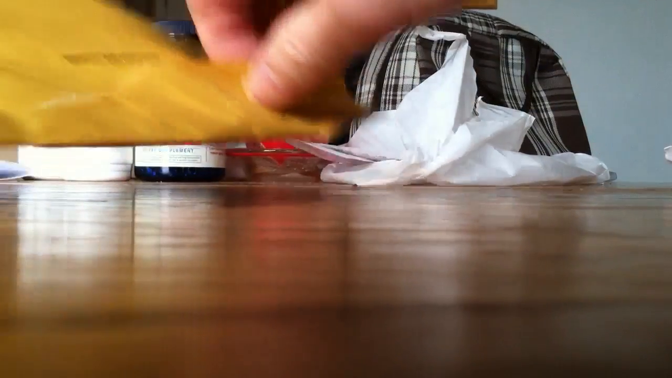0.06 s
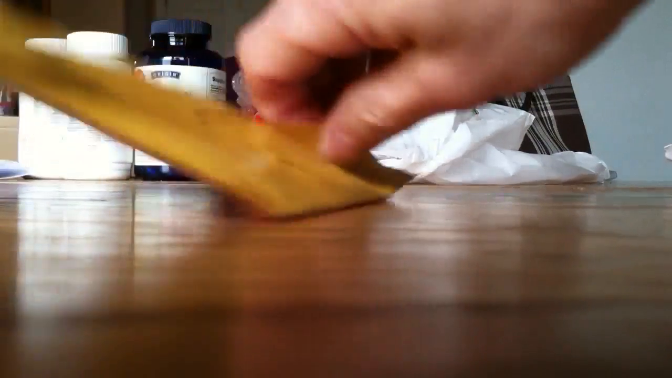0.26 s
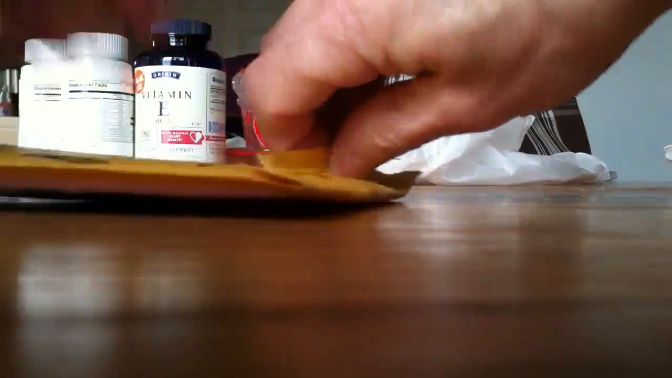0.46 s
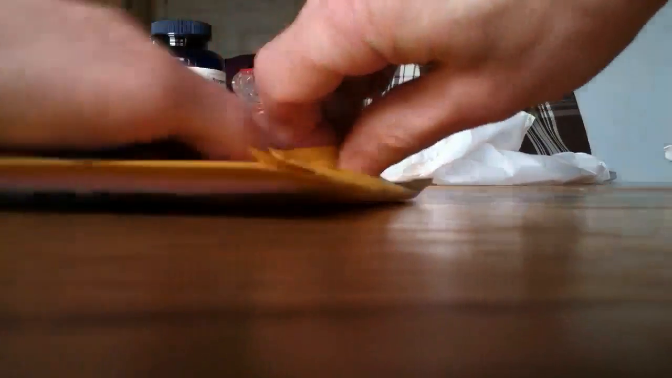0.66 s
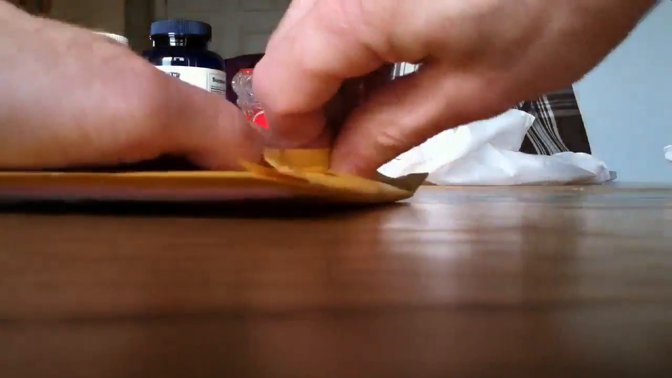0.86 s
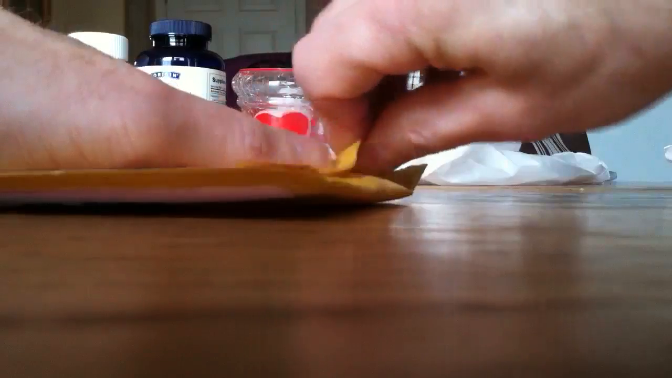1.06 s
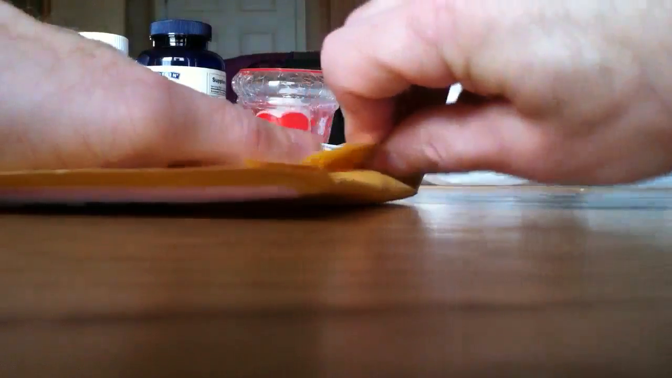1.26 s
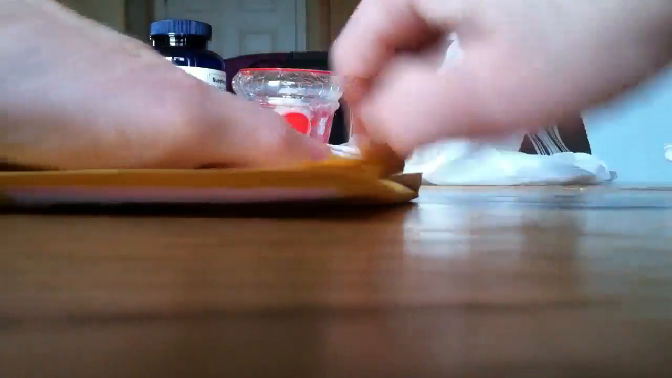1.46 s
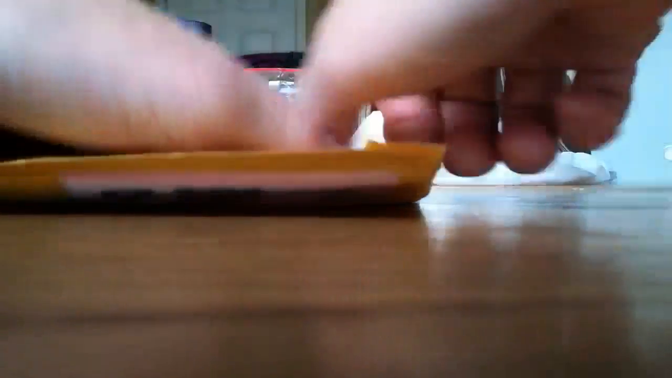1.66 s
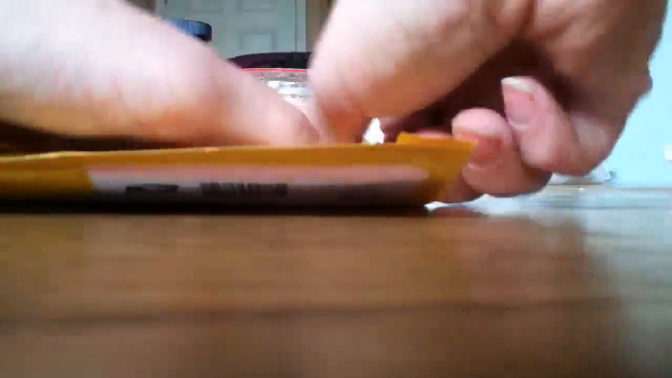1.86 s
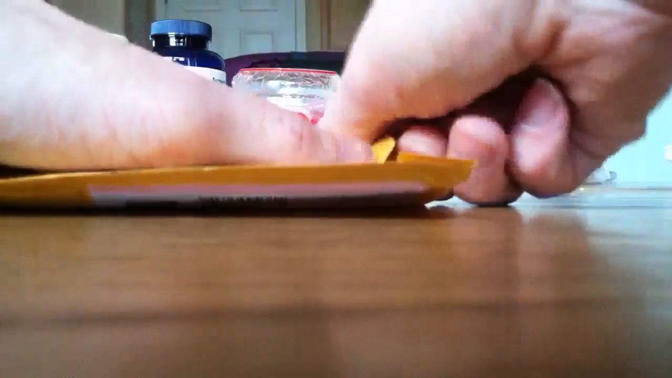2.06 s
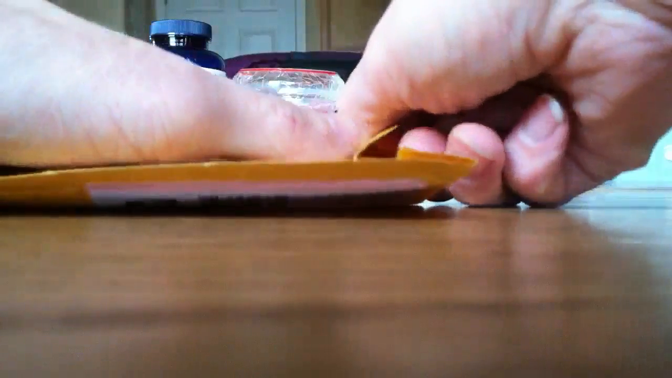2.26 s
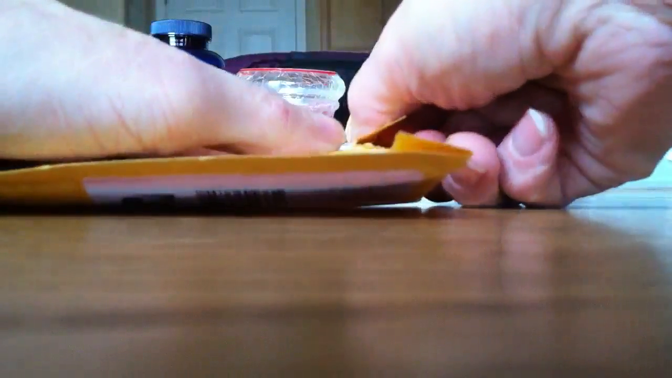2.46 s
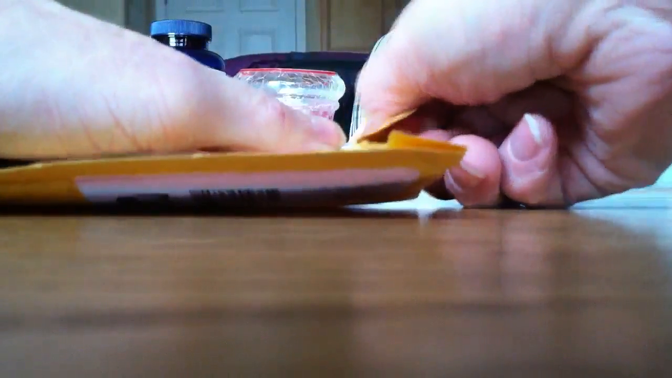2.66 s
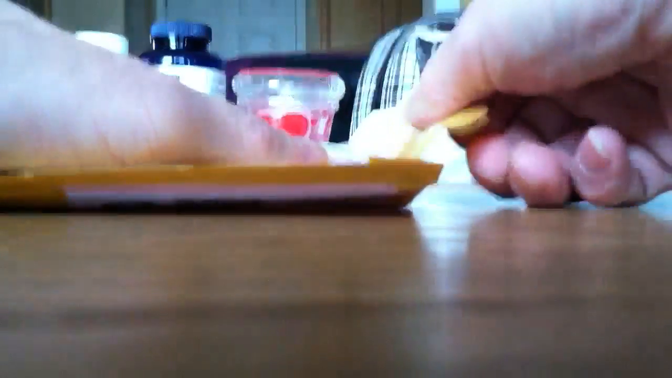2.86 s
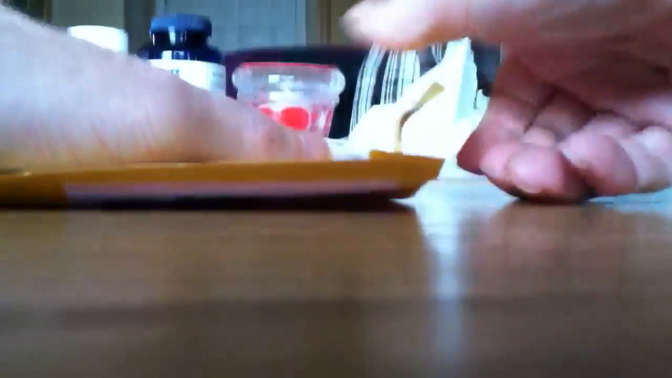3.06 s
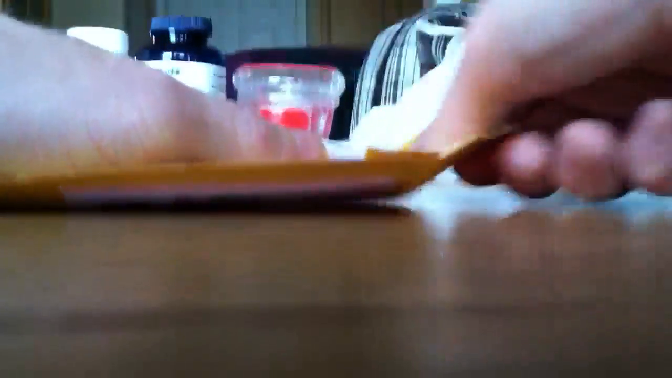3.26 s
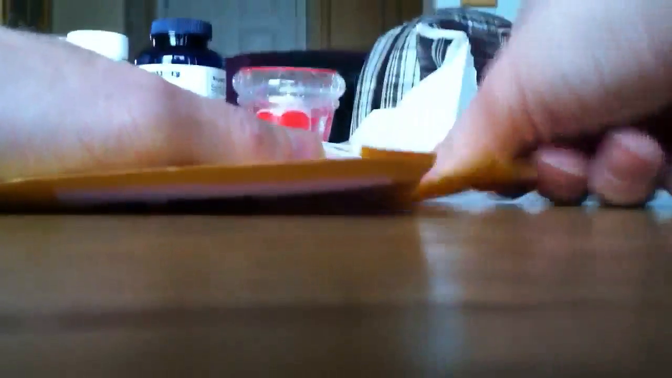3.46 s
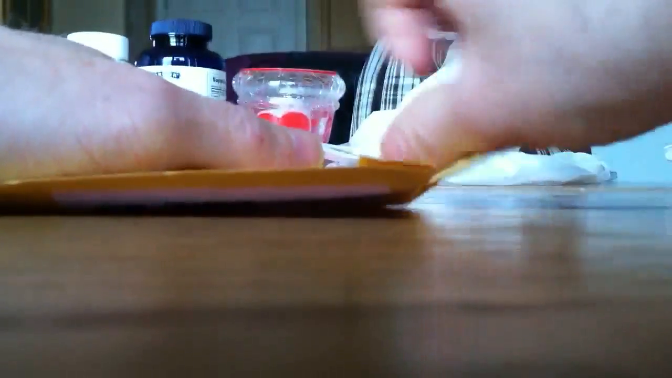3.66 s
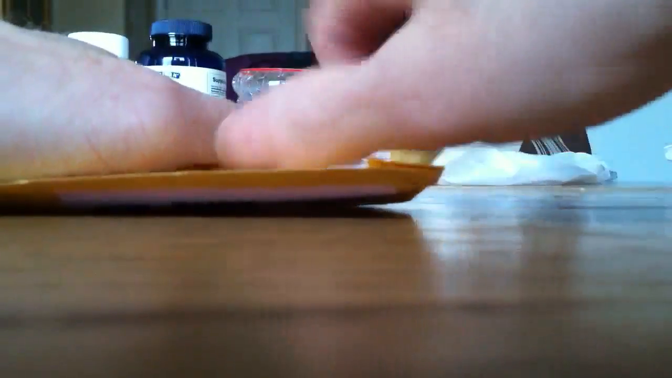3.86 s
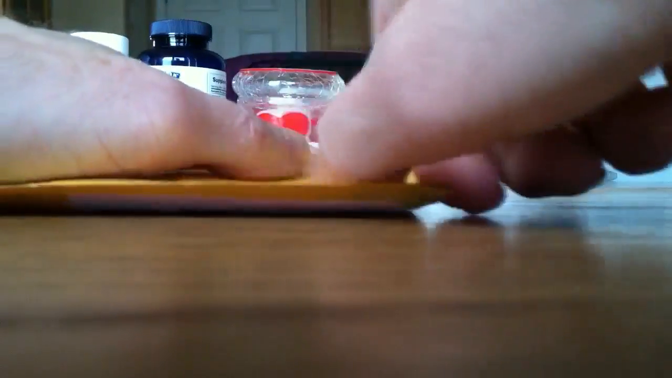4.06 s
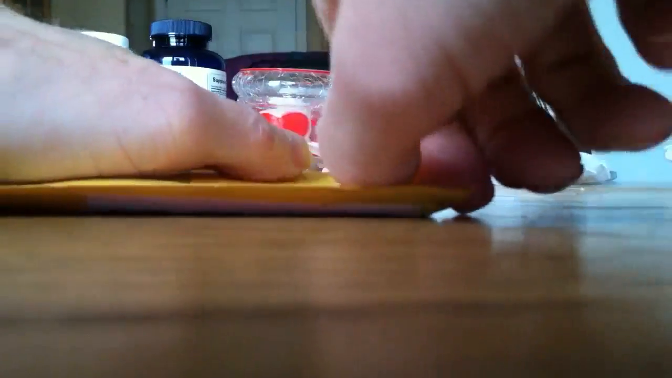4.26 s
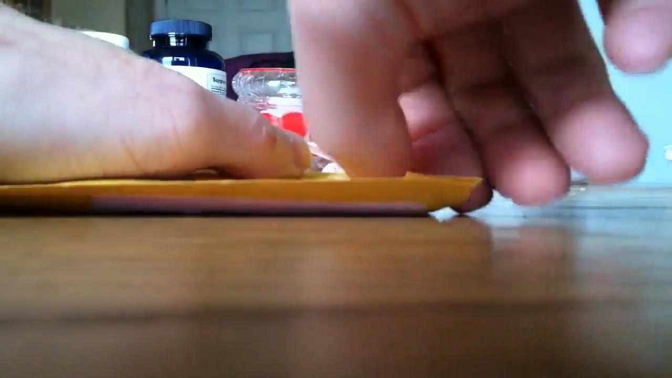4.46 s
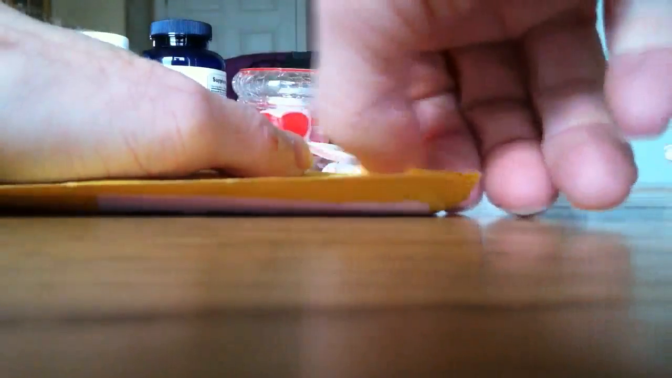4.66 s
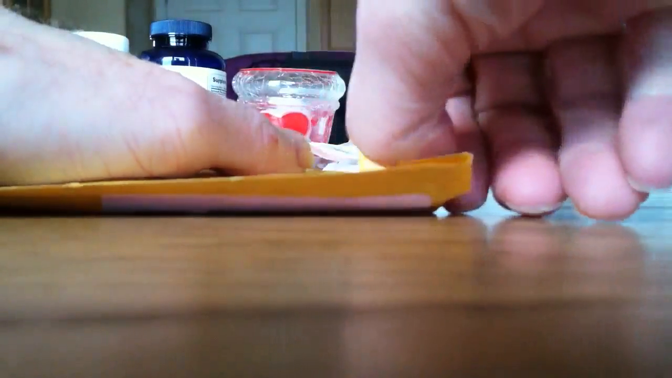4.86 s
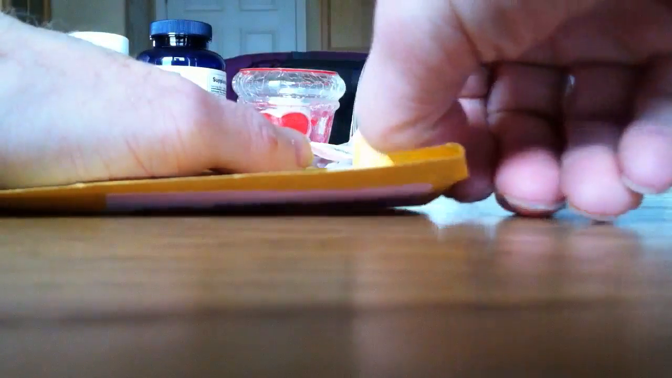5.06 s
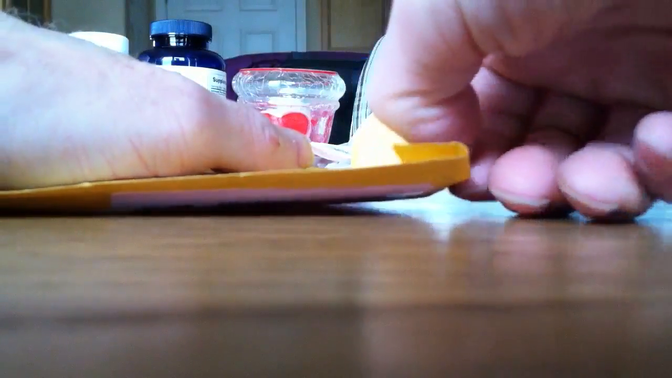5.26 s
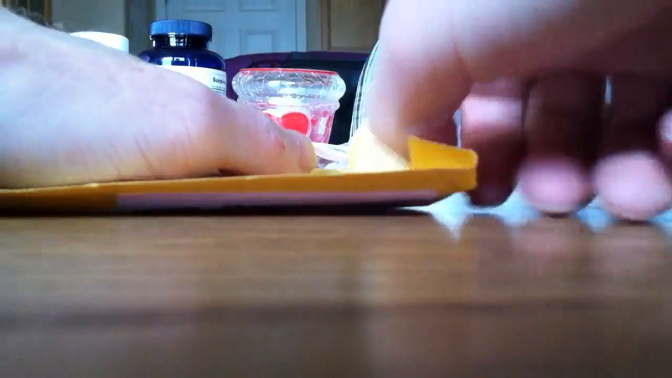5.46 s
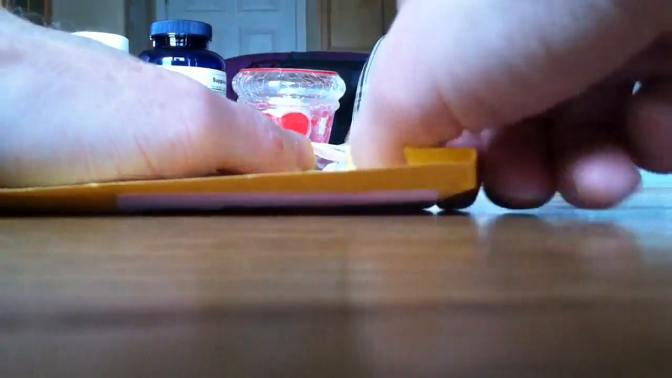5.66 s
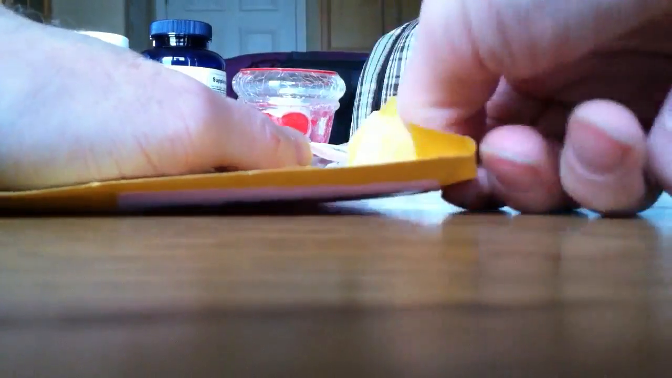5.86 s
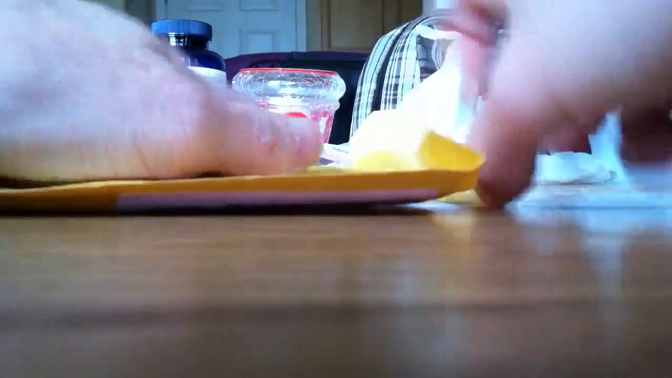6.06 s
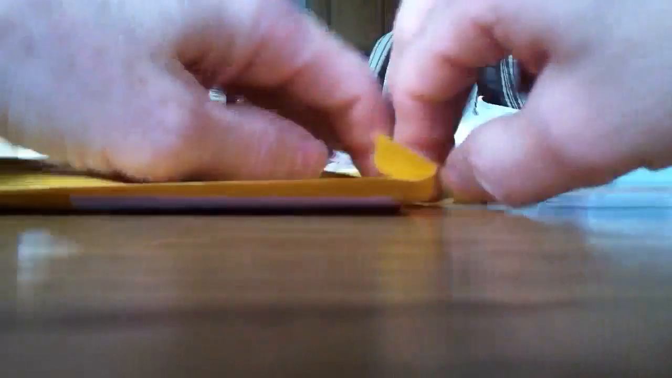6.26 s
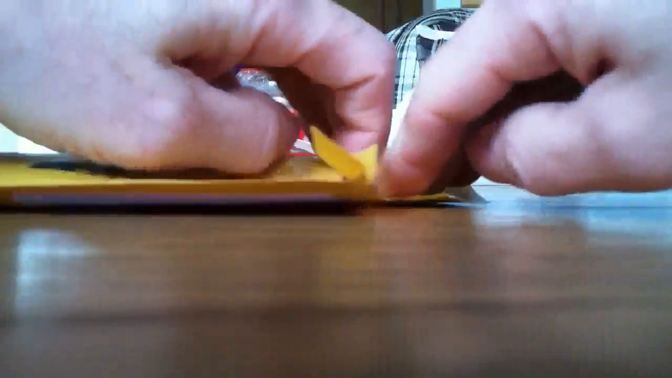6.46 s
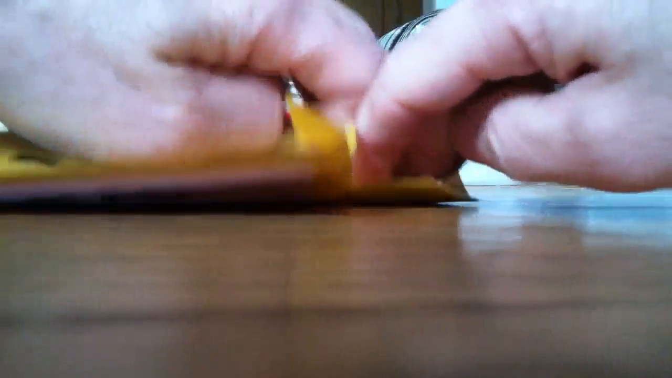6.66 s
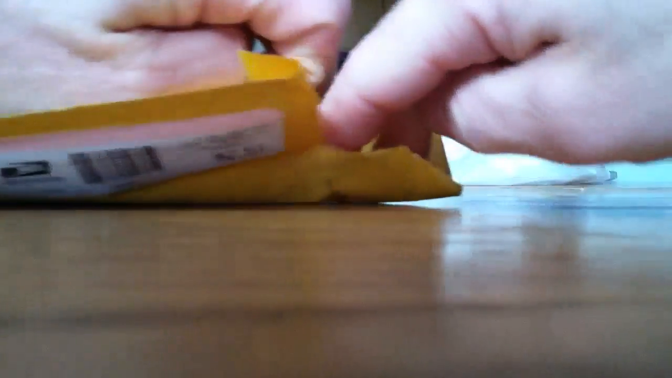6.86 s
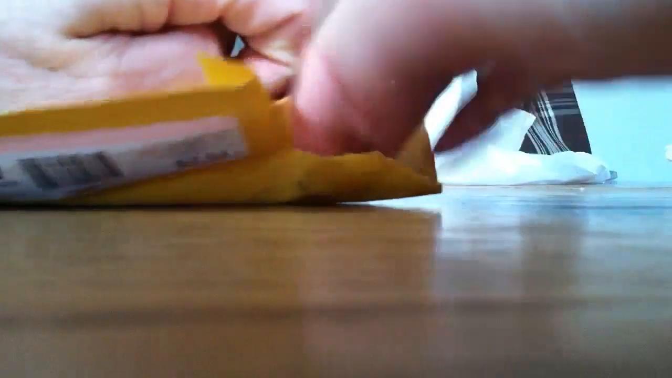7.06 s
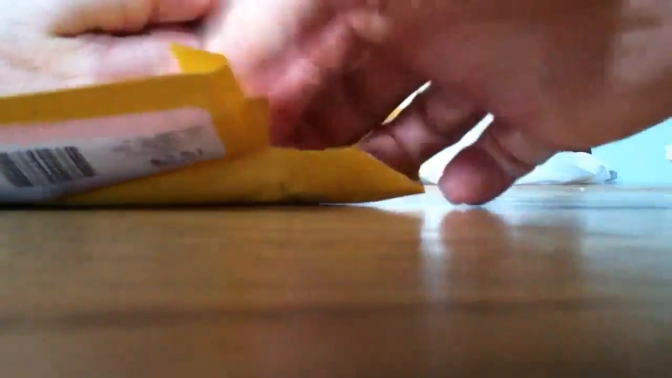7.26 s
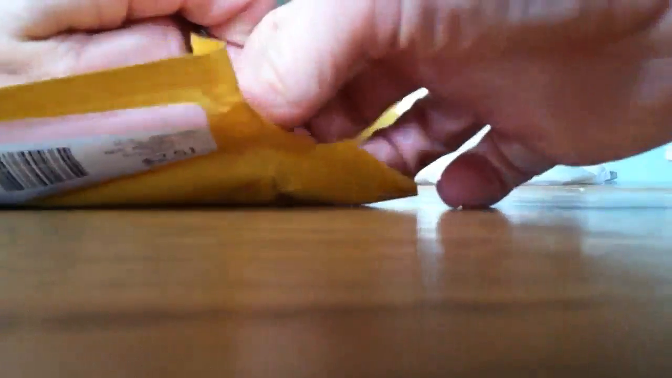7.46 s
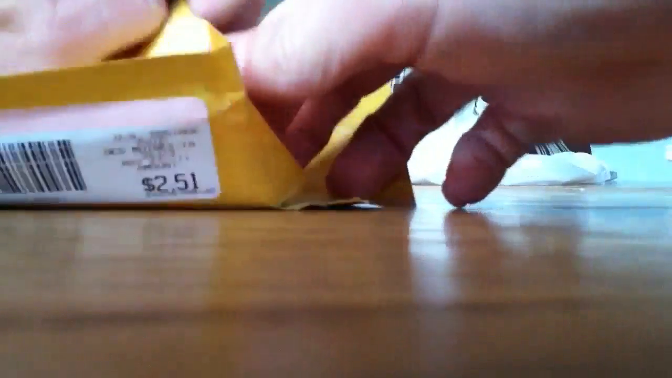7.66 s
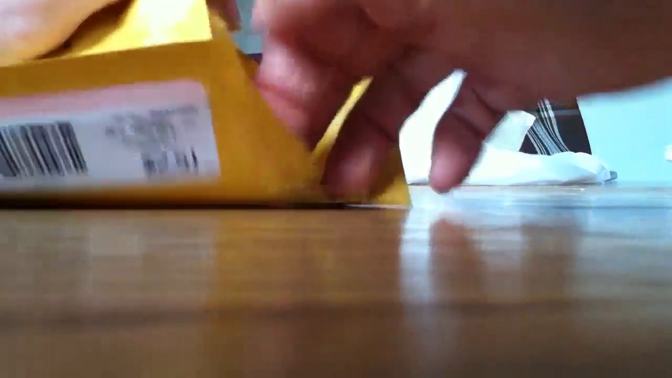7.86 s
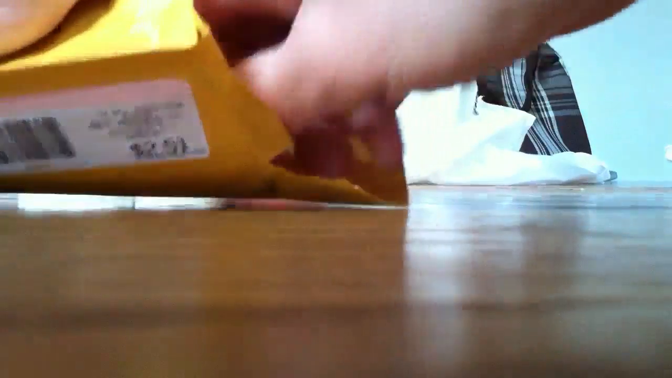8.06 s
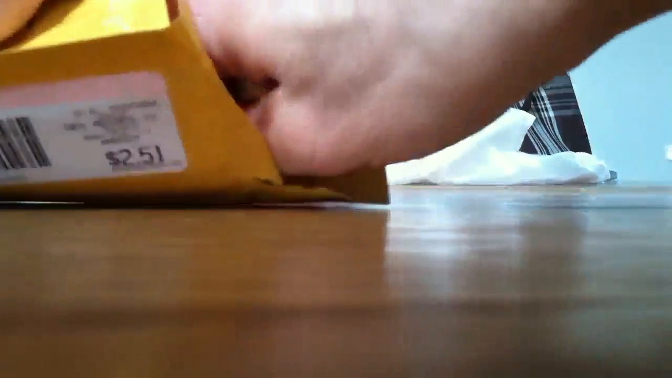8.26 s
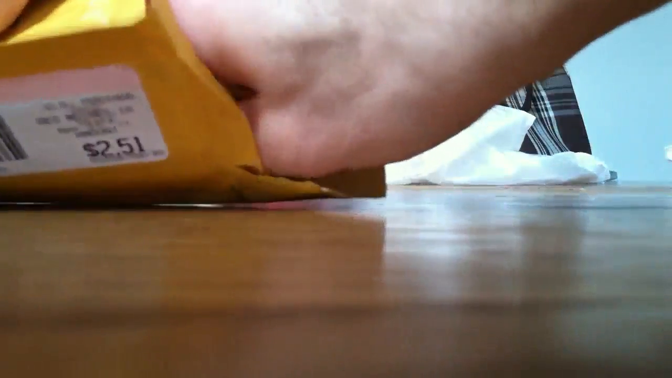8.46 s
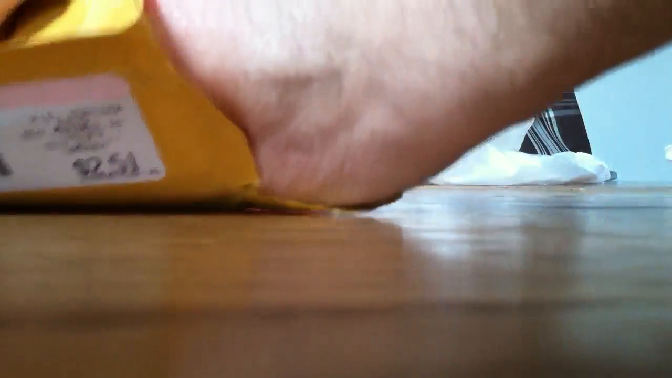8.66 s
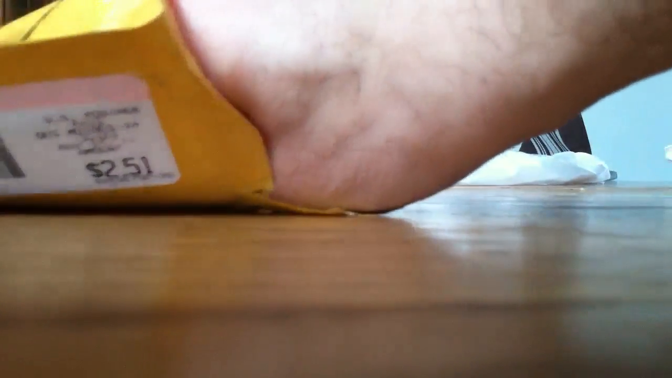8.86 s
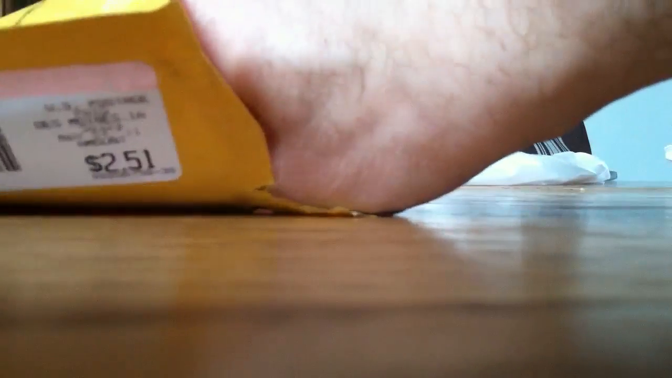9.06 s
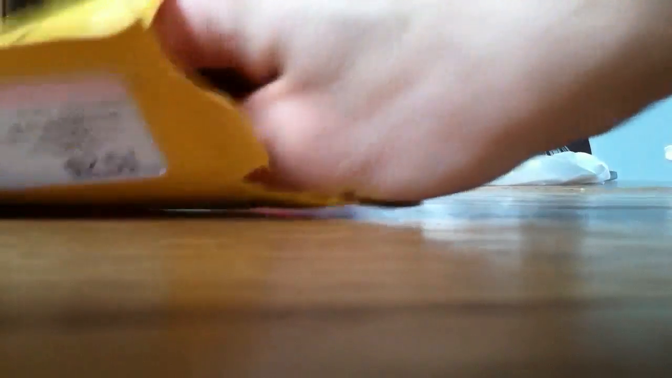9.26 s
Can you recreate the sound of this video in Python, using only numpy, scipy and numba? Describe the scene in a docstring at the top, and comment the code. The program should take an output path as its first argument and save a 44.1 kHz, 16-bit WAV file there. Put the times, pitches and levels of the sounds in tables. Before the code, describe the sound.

A padded paper envelope is handled and torn open on a wooden table, very close to a phone microphone. Light crinkles and snaps come first, then a loud rip, more short tears and a quieter pause of small ticks. Further crackling and ripping follow, ending in hollow sliding and duller folds as a hand reaches inside. A faint appliance hum sits behind.

```python
"""At a wooden table in a quiet room, hands tear open and crinkle a padded paper mailer beside a phone on that table.
Each buckling crease snaps as a short damped ring of its own pitch, with a burst of neighbouring creases.
Crackle and tearing are swarms of such rings over a denser swarm of rubbed fibres; slides sing in the hollow mailer.
The table thumps and rumbles as damped modes and faint pushes; an appliance hums as wavering sines over air noise."""
import sys
import numpy as np
from scipy import signal
from scipy.fft import rfft, irfft
from scipy.io import wavfile
from scipy.ndimage import uniform_filter1d
from numba import njit

SR = 44100
rng = np.random.default_rng(int(sys.argv[2]) if len(sys.argv) > 2 else 0)


def digitize_waveform(pressure):
    """Quantize a signal to 16-bit integers and store it at the path in sys.argv[1].

    Rows of a 2-D input are taken as channels; values are limited to [-1, 1].
    """
    field = np.atleast_2d(pressure).T
    bounded = np.clip(field, -1, 1)
    quanta = np.round(bounded * 32767).astype(np.int16)
    wavfile.write(sys.argv[1], SR, quanta)


N = 410130


def undb(db):
    """Gain of a level in dB."""
    return 10 ** (np.asarray(db) / 20)


def level(x, db):
    """Scale to an rms level in dB."""
    return x * undb(db) / np.sqrt(np.mean(x ** 2))


def curve(table, s):
    """Value of a (t/s, value) table at the given times."""
    return np.interp(s, *np.transpose(table))


def colour(x, points):
    """Causal minimum-phase filter with the gain of (f/Hz, level/dB) points, from the folded cepstrum."""
    hz, db = np.transpose(points)
    size = 4096
    bin_hz = np.arange(size // 2 + 1) * SR / size
    gain_db = np.interp(np.log(bin_hz + 1), np.log(hz), db)
    cepstrum = irfft(np.log(undb(gain_db)))
    cepstrum[1:size // 2] *= 2
    cepstrum[size // 2 + 1:] = 0
    kernel = irfft(np.exp(rfft(cepstrum)))
    return signal.fftconvolve(x, kernel)[:len(x)]


def walk(rate):
    """Gliding random control: a new normal value each 1 / rate s, smoothed over the same time; spread near 1."""
    hold = int(SR / rate)
    steps = np.repeat(rng.standard_normal(N // hold + 1), hold)
    return uniform_filter1d(steps, hold)[:N]


@njit
def rings(n, sr, s, hz, t60, size, rise):
    """Damped sines that start at the given times and swell with a time constant of `rise` cycles."""
    y = np.zeros(n)
    for k in range(len(s)):
        turn = np.exp(2j * np.pi * hz[k] / sr - np.log(1000) / (t60[k] * sr))
        z, start = size[k] + 0j, int(s[k] * sr)
        shut, closing = 1., np.exp(-hz[k] / (rise * sr))
        for i in range(start, min(n, start + int(t60[k] * sr))):
            y[i] += z.imag * (1 - shut)
            z, shut = z * turn, shut * closing
    return y


def creases(s, hz, cycles, size):
    """A crease dies away over a number of cycles, so small bright ones are the shortest."""
    hz = np.clip(hz, 150, .4 * SR)
    return rings(N, SR, s, hz, cycles / hz, size, rise=0.13)


def rattle(s, hz, cycles, size, t60, db, octaves, count, lead=0):
    """Each crease sets off neighbours of other pitches, weaker with distance in time; a share leads up to it."""
    lag, pitch, sign = rng.random((len(s), count, 3)).T
    lag = lag - lead  # in units of t60
    near_s = s + t60 * lag
    near_hz = hz * 2 ** (octaves * (2 * pitch - 1))
    near_size = size * undb(db - 60 * np.abs(lag)) * np.sign(sign - .5)
    neighbours = creases(near_s.ravel(), near_hz.ravel(), cycles, near_size.ravel())
    return creases(s, hz, cycles, size) + neighbours


def swarm(folding, centre_hz, octaves, cycles, spread_db, sag, count, drift=0.15, near=0.74):
    """Many creases at random moments, unequal by spread_db; large folds lower the pitch by sag; rms 1."""
    when, pitch, big, sign = rng.random((count, 4)).T
    s = when * N / SR
    size = undb(-spread_db * np.clip(np.log(1 - big), -3.2, 0)) * np.sign(sign - .5)
    # octaves: the centre pitch of the swarm drifts up and down at random
    wander = drift * walk(14)[(when * N).astype(int)]
    lowering = sag * curve(folding, s)  # sag: octaves per dB
    hz = centre_hz * 2 ** (octaves * (2 * pitch - 1) - lowering + wander)
    return level(rattle(s, hz, cycles, size, t60=.012, db=4.5, octaves=near, count=5), 0)


# appliance hum partials, before they waver: f/Hz, rms level/dB
HUM_PARTIALS = [(242.2, -65.5), (290.7, -71)]
# spectrum of the room's air noise: f/Hz, relative level/dB
AIR_SPECTRUM = [(40, -20.5), (125, -3), (240, 4), (480, -1), (900, -13), (2000, -23), (4700, -32),
                (5100, -45), (9700, -37.5), (14000, -74)]
AIR_DB = -60.5  # rms


def room_tone():
    """Appliance hum: sines wavering in level and phase, over soft coloured air noise."""
    t = np.arange(N) / SR
    hum = np.zeros(N)
    for hz, db in HUM_PARTIALS:
        gain = np.sqrt(2) * undb(db + 3.4 * walk(6))
        hum += gain * np.sin(2 * np.pi * (hz * t + 0.27 * walk(9.8)))
    air = level(colour(rng.standard_normal(N), AIR_SPECTRUM), AIR_DB)
    return hum + air


def echo(x, t60, db):
    """The room answers with a short decaying noise tail after a 4 ms gap."""
    t = np.arange(int(t60 * SR)) / SR
    tail = rng.standard_normal(len(t)) * undb(-60 * t / t60) * (t > .004)
    tail /= np.sqrt(np.sum(tail ** 2))
    return x + undb(db) * signal.fftconvolve(x, tail)[:N]


# fingers and mailer bump the table: t/s, nominal level/dB
TABLE_BUMPS = [(0.232, -46.5), (0.303, -48), (0.401, -43.5), (0.414, -44), (1.294, -49), (2.775, -34.5),
               (3, -45), (3.72, -40), (3.955, -47), (6.529, -45), (7.106, -39), (7.186, -41.5),
               (7.278, -42.5), (7.617, -32.5), (7.788, -37), (8.186, -37), (8.31, -42), (8.571, -41),
               (8.587, -40), (8.677, -42), (8.712, -43.5), (9.204, -44.5)]
# table-top modes: f/Hz, nominal level/dB against the bump, t60/s
TABLE_MODES = [(125.7, 6, 0.074), (229, 9, 0.027), (341, 9, 0.02), (570, 18, 0.0048)]


def bumps():
    """A soft push rings the table modes in a random mix; the padded paper knocks along with it."""
    s, db = np.transpose(TABLE_BUMPS)
    thump = np.zeros(N)
    for hz, mode_db, t60 in TABLE_MODES:
        size = undb(db + mode_db + 5.0 * rng.standard_normal(len(s)))
        thump += rings(N, SR, s, hz + 0 * s, t60 + 0 * s, size, rise=0.55)
    knock = rattle(s, 520 + 0 * s, 4.1, undb(db + 6.0), t60=0.068, db=3.0, octaves=1.0, count=12, lead=0.29)
    return thump + knock


def gestures(t, rows, rise_db_s, fall_db_s):
    """Power of each gesture (it builds, holds, dies away) and the last column of its row."""
    for s, held, db, last in rows:
        early = np.maximum(s - t, 0)
        late = np.maximum(t - s - held, 0)
        yield undb(2 * (db - rise_db_s * early - fall_db_s * late)), last


# hands rest on and knead the mailer: t/s, crackle drive level/dB, dull-fold level/dB against the crackle
KNEADING_CURVE = [(0.0, -58, -9), (0.41, -51.5, -7), (0.62, -78, -1), (0.85, -54, -15), (1.18, -56, -14.5),
                  (1.5, -51, -10), (2.2, -51.5, -6.5), (3.2, -61, -7.5), (3.96, -56.5, -9.5),
                  (4.67, -67.5, -6.5), (5.38, -63.5, -1), (5.48, -55, -4.5), (5.82, -53, -25),
                  (5.948, -70, -2), (6.581, -48, -10), (7.67, -52.5, 0), (7.959, -56, -6.5), (8.6, -50, 2),
                  (8.86, -60.5, -2), (9.13, -53, -4.5)]
# tugs and squeezes crumple the paper: full at t/s, held/s, crackle drive level/dB, dull-fold level/dB
TUG_GESTURES = [(0.691, 0.043, -43.5, -6.5), (1.03, 0.033, -45, -11.5), (1.564, 0.012, -46, -6.5),
                (1.8, 0.008, -47, -2), (2.82, 0.077, -43, 2.5), (3.34, 0.014, -37, -9.5),
                (3.745, 0.0048, -47, -8), (4.731, 0.027, -48.5, -10), (5.059, 0.0049, -36, -27),
                (5.209, 0.007, -36.5, -19), (6.038, 0.065, -42, -7.5), (6.89, .01, -42, -12),
                (6.99, 0.0067, -43.5, 4), (7.354, 0.017, -39, -9.5)]
TUG_RISE_DB_S, TUG_FALL_DB_S = 278, 196
# quick rips where the paper gives way: full at t/s, held/s, crackle drive level/dB, dull-fold level/dB
RIP_GESTURES = [(0.641, 0.049, -47, -9), (0.986, 0.0074, -43.5, -14), (2.701, 0.063, -32, -5.5),
                (2.751, 0.038, -21.5, -5), (3.239, 0.034, -45, 2.5), (3.296, 0.034, -30, -12.5),
                (3.409, 0.0061, -58, -20), (3.518, 0.0092, -30.5, -10), (3.651, 0.0064, -39, -5),
                (3.712, 0.014, -39, -5.5), (6.712, 0.076, -32.5, -9), (6.924, 0.0041, -35.5, -9),
                (7.525, 0.0021, -28.5, 2.5), (7.568, 0.0017, -30, 0.5), (7.608, 0.0013, -27.5, 5.5)]
RIP_RISE_DB_S, RIP_FALL_DB_S = 1115, 1015


def handling():
    """Summed drive of all gestures, and the dull share led by the strongest of the moment (dB, each ms)."""
    t = np.arange(0, N / SR, .001)
    s, db, dull_db = np.transpose(KNEADING_CURVE)
    power = undb(2 * np.interp(t, s, db))
    dull = power * np.interp(t, s, dull_db)
    tugs = gestures(t, TUG_GESTURES, TUG_RISE_DB_S, TUG_FALL_DB_S)
    rips = gestures(t, RIP_GESTURES, RIP_RISE_DB_S, RIP_FALL_DB_S)
    for gesture_power, gesture_dull_db in (*tugs, *rips):
        power = power + gesture_power
        dull = dull + gesture_power * gesture_dull_db
    effort = np.transpose([t, 10 * np.log10(power)])
    folding = np.transpose([t, dull / power])
    return effort, folding


def rumble():
    """The hands shake the table top in a patter of faint pushes, most when they press large folds."""
    effort, folding = handling()
    t = np.arange(N) / SR
    patter = swarm(folding, centre_hz=211.0, octaves=0.98, cycles=4.4, spread_db=6.0, sag=0, count=900)
    return undb(curve(effort, t) + curve(folding, t) / 2 - 10.5) * patter


# skin and paper slide along the mailer: full at t/s, held/s, drive level/dB, brightness/dB per octave
SLIDE_GESTURES = [(4.029, 0.069, -53, 6), (5.47, 0.07, -59.5, 2), (7.767, 0.023, -47.5, -14.5),
                  (7.895, 0.02, -49.5, 2), (7.995, 0.027, -49.5, -6), (8.125, 0.056, -45.5, -3.5),
                  (8.32, 0.042, -47, -9), (8.45, 0.13, -49, -6), (9.277, 0.074, -40.5, -1.5)]
# resonances of the hollow mailer: f/Hz, level/dB against the slide's swell
POCKET_RESONANCES = [(1020, -12), (2250, -3.5), (4450, -6.5)]


def slides(fibres, folding):
    """Each slide is a swell of rubbed fibres that sings in the wandering resonances of the hollow mailer."""
    t = np.arange(0, N / SR, .001)
    rows = list(gestures(t, SLIDE_GESTURES, 2 * TUG_RISE_DB_S, 2 * TUG_FALL_DB_S))

    def swell(octave):
        """Slide envelope, tilted by each slide's brightness."""
        power = sum(p * undb(2 * tilt * octave) for p, tilt in rows)
        return np.interp(np.arange(N) / SR, t, np.sqrt(power))

    sung = np.zeros(N)
    for hz, db in POCKET_RESONANCES:
        octave = np.log2(hz / POCKET_RESONANCES[1][0])  # from the middle resonance
        resonance = swarm(folding, hz, octaves=0.087, cycles=13.0, spread_db=-0.5, sag=0,
                          drift=0.11, near=0.14, count=2000)
        sung += undb(db) * swell(octave) * resonance
    return undb(1.8 * walk(40)) * (undb(-1.5) * swell(0) * fibres + sung)


RUB_DB = -7  # rubbed fibres against the crackle drive, before they flutter


def crackle():
    """Clumped crackle and the dense slip of rubbed fibres share the handling; large folds add the dull part."""
    t = np.arange(N) / SR
    effort, folding = handling()
    bright_db, dull_db = curve(effort, t), curve(folding, t)
    bright = swarm(folding, centre_hz=3500, octaves=0.81, cycles=9.3, spread_db=1.5, sag=0.015, count=6000)
    dull = swarm(folding, centre_hz=886, octaves=0.96, cycles=15.0, spread_db=1.0, sag=0, count=5000)
    fibres = swarm(folding, centre_hz=3250, octaves=1.29, cycles=5.5, spread_db=0.0, sag=0.049, count=24000)
    # lone fibres let go
    ticks = swarm(folding, centre_hz=4100, octaves=0.9, cycles=4.9, spread_db=1.0, sag=0, count=450)

    # above -31 dB drive the bright crackle grows more slowly, so fibres and dull creases carry hard rips
    clumps_db = 3.76 * walk(120) - 0.64 * np.maximum(bright_db + 31, 0)
    handled = undb(clumps_db - 5.5) * bright
    handled += undb(RUB_DB + 1.1 * walk(45)) * fibres
    handled += undb(dull_db + 1.6 * walk(100)) * dull
    handled *= undb(bright_db + 2.0 * walk(30))
    lone = undb(np.minimum(bright_db, -50) - 7) * ticks
    return handled + lone + slides(fibres, folding)


# single loud creases: t/s, nominal ring level/dB, f/Hz
LOUD_CREASES = [(0.3726, -19, 3620), (0.6824, -24.5, 5000), (0.7438, -26, 1490), (1.206, -30.5, 3870),
                (1.5012, -27.5, 2580), (1.801, -24, 5060), (1.813, -25.5, 2380), (1.844, -22.5, 2430),
                (2.1045, -18.5, 1940), (2.117, -22, 1570), (2.186, -37, 1090), (2.295, -29, 920),
                (2.3555, -24.5, 1610), (2.654, -23.5, 2680), (2.706, -18, 1780), (2.7275, -9.5, 1510),
                (2.737, -4, 1780), (2.7748, -5, 1760), (2.7851, -15.5, 1930), (2.871, -21.5, 1690),
                (2.8809, -20, 1430), (2.8887, -29, 2500), (2.9999, -30, 1940), (3.2897, -5.5, 1870),
                (3.3297, -17.5, 5200), (3.405, -16.5, 5900), (3.571, -24, 6260), (3.675, -31, 1500),
                (3.7055, -16.5, 3080), (3.817, -27.5, 6540), (3.952, -18.5, 2720), (4.275, -34.5, 6350),
                (4.312, -39, 2980), (4.402, -45.5, 1470), (4.509, -42.5, 4770), (4.553, -44.5, 800),
                (4.595, -42.5, 2680), (4.6306, -38.5, 6660), (4.727, -19.5, 2740), (4.7374, -23, 7640),
                (5.0366, -26, 2800), (5.059, -8.5, 4600), (5.1276, -15, 4370), (5.1801, -24, 4930),
                (5.264, -27, 4970), (5.667, -28, 5900), (5.687, -22, 6350), (5.8186, -30.5, 2440),
                (5.8317, -30, 1670), (6.0427, -24.5, 4940), (6.1073, -24.5, 2200), (6.263, -24, 1920),
                (6.613, -26.5, 3460), (6.664, -18.5, 4700), (6.673, -20, 6300), (6.691, -23, 3060),
                (6.7157, -23, 5100), (6.7359, -15.5, 4600), (6.7533, -11.5, 3700), (6.759, -14, 3940),
                (6.7657, -16, 4270), (6.792, -23, 4200), (6.803, -20.5, 3800), (6.8894, -23, 4730),
                (6.959, -22, 1320), (6.9857, -12, 1880), (7.1631, -16.5, 2140), (7.3136, -25.5, 1310),
                (7.347, -22, 5000), (7.3969, -17.5, 3800), (7.492, -20, 2290), (7.5224, -15, 6200),
                (7.531, -8, 3200), (7.5658, -17.5, 2980), (7.572, -14, 3430), (7.607, -4, 3430),
                (7.6109, -3, 3000), (7.6417, -17, 1940), (7.7919, -24, 2540), (8.1651, -25, 760),
                (8.253, -27, 1890), (8.479, -32, 1030), (8.489, -26.5, 1110), (8.551, -29, 3000),
                (8.571, -23, 613), (8.5858, -20, 2100), (8.6758, -26.5, 1860), (8.7127, -16.5, 2220),
                (8.9282, -13.5, 2590)]


def snaps():
    """Each loud crease: a ring with a burst of neighbours, a sharp tick and the dull flex of the sheet."""
    s, db, hz = np.transpose(LOUD_CREASES)
    ring = rattle(s, hz, 9.0, undb(db), t60=.016, db=0.5, octaves=.5, count=16, lead=0.0595)
    tick = creases(s, 1.9 * hz, 2.5, undb(db + 6.5))
    flex_hz = 550 + 500 * rng.random(len(s))
    flex_size = undb(db - 15.5) * 2000 / hz  # low creases flex the sheet more
    flex = creases(s + 0.0014, flex_hz, 15.0, flex_size)
    return ring + tick + flex


# a thin sheet radiates little bass: f/Hz, level/dB
SHEET_RADIATION = [(150, -26), (500, -6), (900, 0)]
# microphone response: f/Hz, level/dB
MIC_RESPONSE = [(60, -42.5), (110, -17), (160, 1), (2500, -1.5), (4700, 3.5), (5100, -1), (7500, 6.5),
                (11000, 5), (14500, -4), (16400, -32)]


def scene():
    """Paper with the room's short echo, and the shaken table, as the microphone colours them, over room tone."""
    paper = echo(colour(crackle() + snaps(), SHEET_RADIATION), t60=0.15, db=-16.0)
    close = colour(paper + bumps() + rumble(), MIC_RESPONSE)
    return (close + room_tone())[None]


TOP_HZ = 16500


def record(dry):
    """The phone rounds the loudest peaks and cuts the top with a steep low-pass."""
    rounded = .8 * np.tanh(dry / .8)
    low_pass = signal.ellip(12, .2, 110, TOP_HZ, fs=SR, output="sos")
    return signal.sosfilt(low_pass, rounded)


dry = scene()
out = record(dry)
digitize_waveform(out)
```